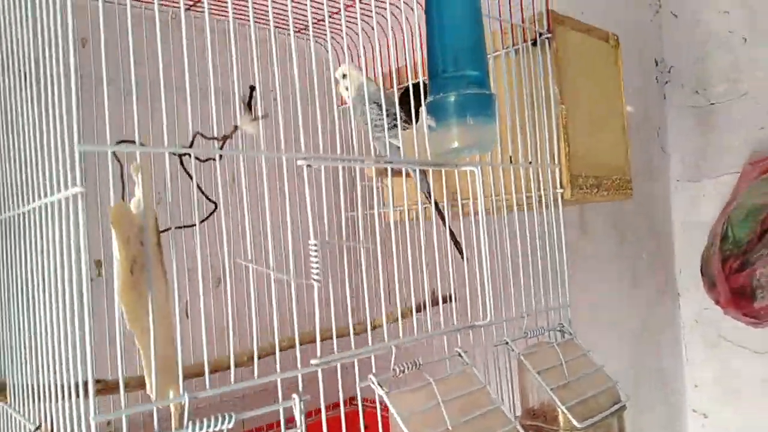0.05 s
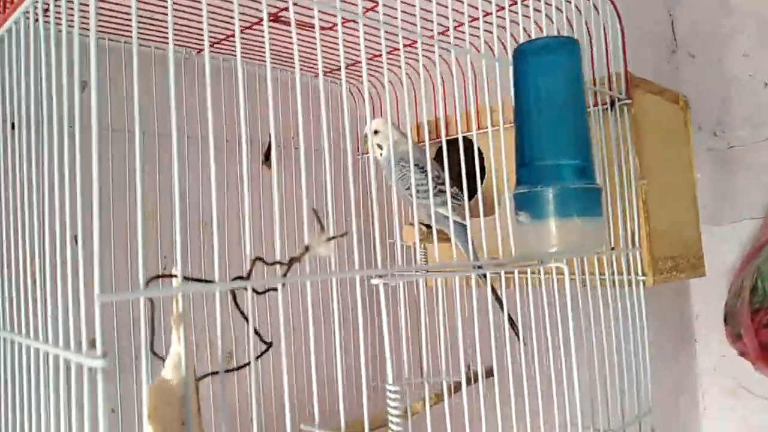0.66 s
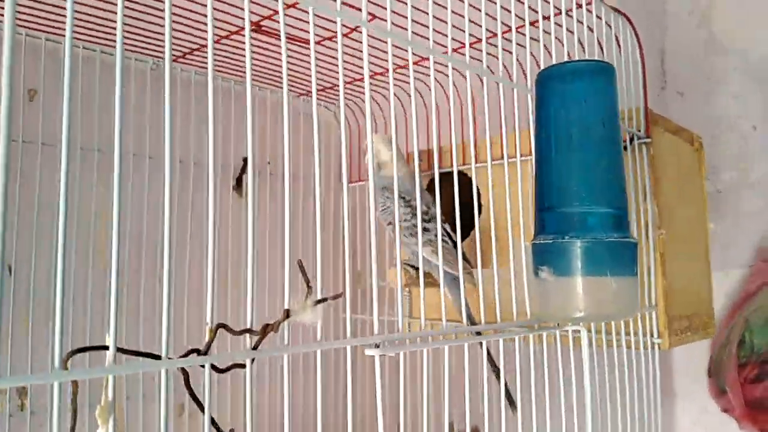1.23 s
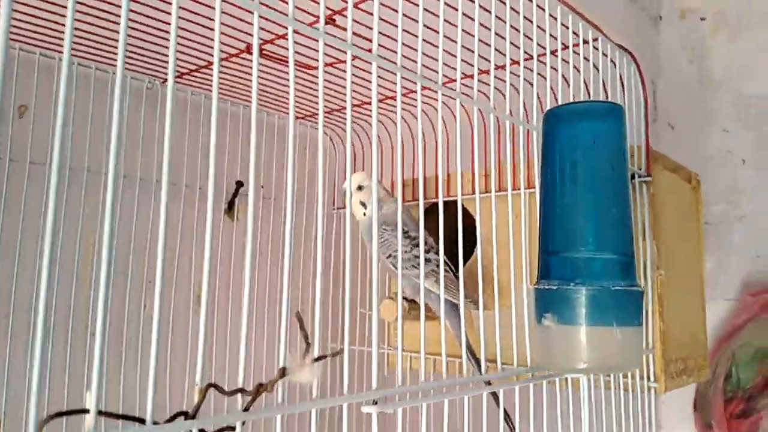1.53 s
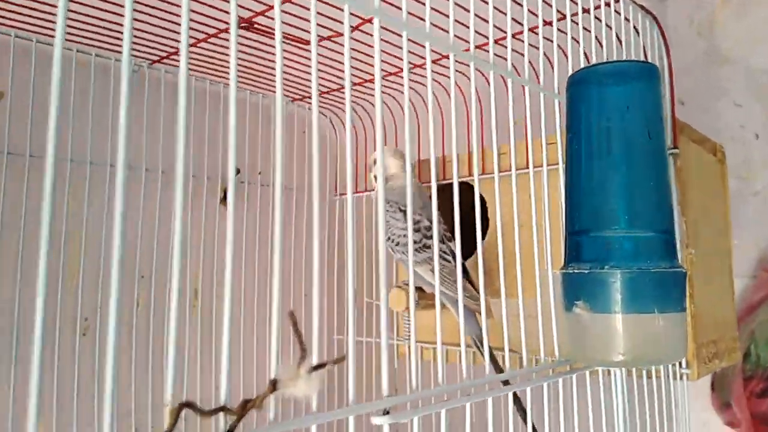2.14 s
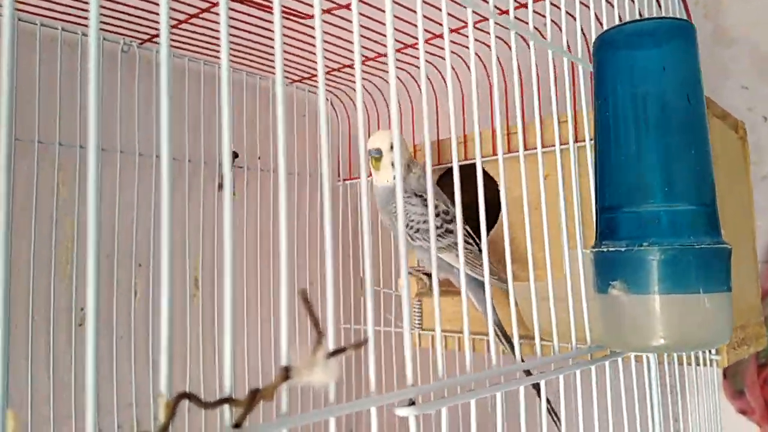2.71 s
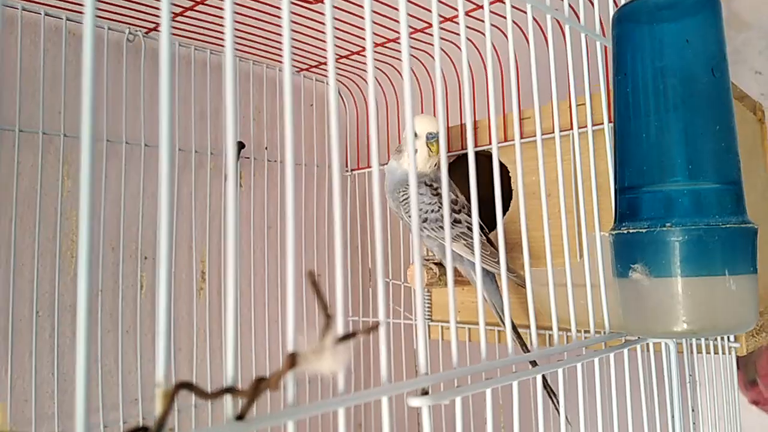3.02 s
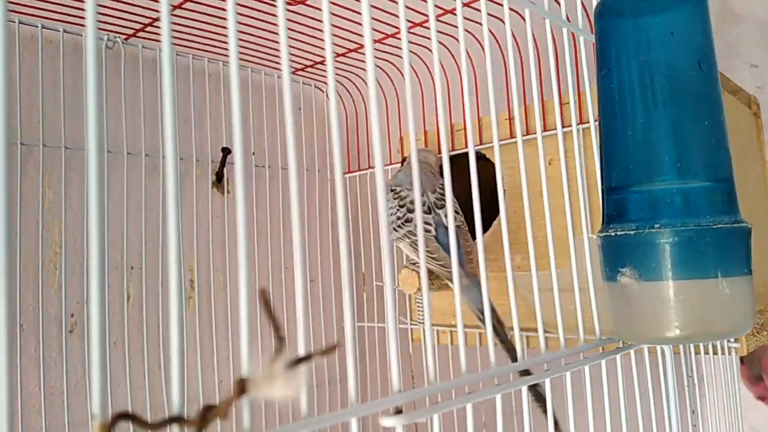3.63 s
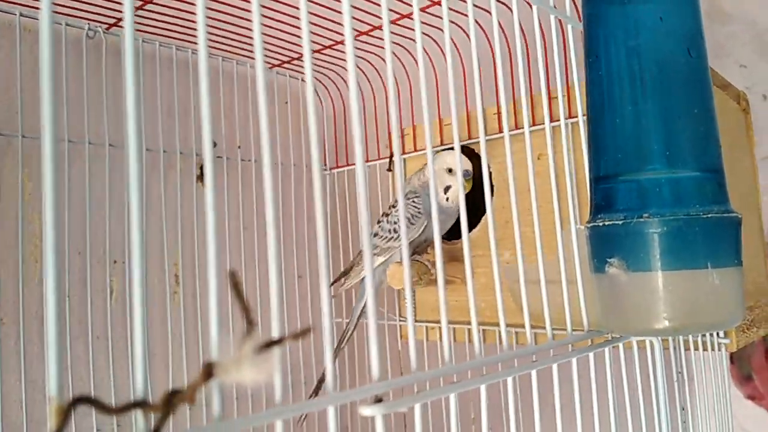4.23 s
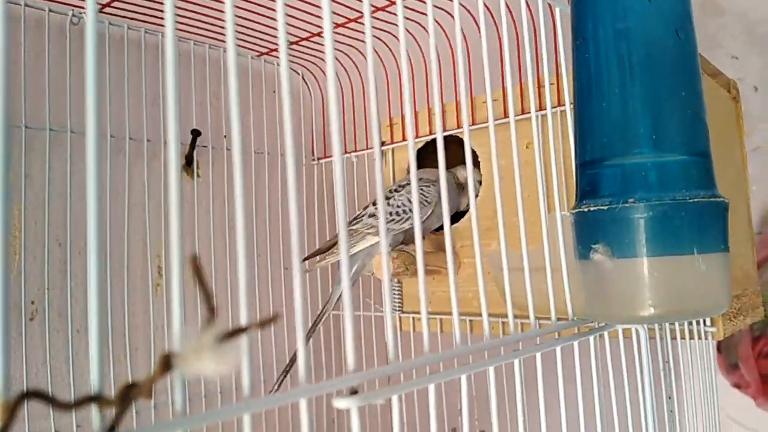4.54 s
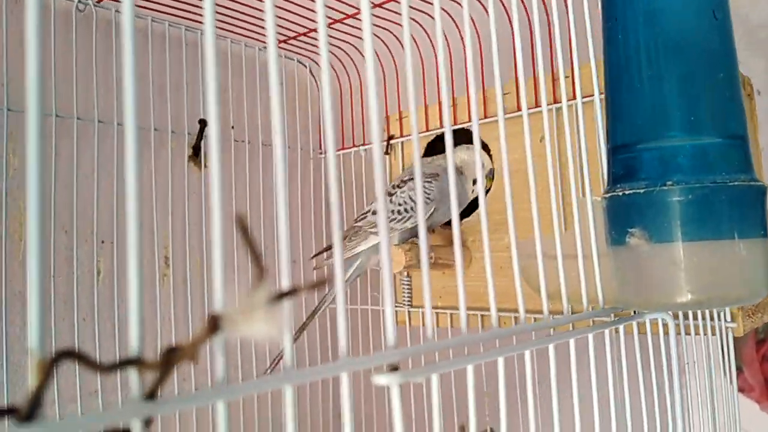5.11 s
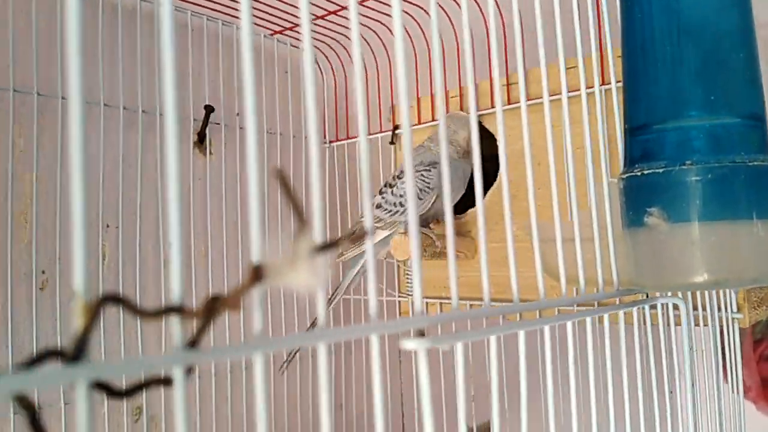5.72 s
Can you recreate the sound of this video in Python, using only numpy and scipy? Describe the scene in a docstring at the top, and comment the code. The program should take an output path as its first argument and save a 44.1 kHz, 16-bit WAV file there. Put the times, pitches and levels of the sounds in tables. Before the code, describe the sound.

Several budgies chatter in short bursts in a bare room, one shrieking loudly, while feathers rustle and a hollow nest box is bumped.

```python
"""Budgerigars chatter in a wire cage in a bare room, one near on the left, others further off.
They open with dry rasps, squeaks and whistles that fall and break up, each a buzz of the syrinx shaped
by windpipe and beak, while feathers rustle, wires tick and the hollow nest box takes a double bump.
After a lull and a distant mutter, more bumps and scuffs set the box ringing. Near five seconds one
shriek overloads the microphone; a warble and a last chirp follow. The room rumbles low throughout."""
import sys
import numpy as np
from scipy import signal
from scipy.fft import rfft, irfft
from scipy.io import wavfile

SR = 44100
rng = np.random.default_rng(int(sys.argv[2]) if len(sys.argv) > 2 else 0)


def store_wav(level_fs):
    """Save 16-bit WAV to argv[1]."""
    pcm = np.round(np.clip(np.atleast_2d(level_fs), -1, 1) * 32767)
    wavfile.write(sys.argv[1], SR, pcm.T.astype(np.int16))


N = 258426
TIME = np.arange(N) / SR
CUTOFF_HZ = 14900


def syllable(contour, breath_db, air_db, attack_s=0.0012, release_s=0.0035, harmonics=14):
    """The syrinx buzzes at one pitch; as it turns rough, its cycles scatter in length and strength."""
    # The two pass bands of windpipe and beak. Each row: frequency in Hz, gain in dB.
    lower_band = [(500, -30.5), (900, -16), (1400, -17), (2200, 3.5), (3000, 1), (4200, -3.5), (5000, -4),
                  (6200, -65)]
    upper_band = [(4200, -31), (5200, -13), (7000, 8.5), (8300, -12), (9200, -14), (10000, -56.5),
                  (15000, -55.5)]
    # Thin air noise from the beak of a rough voice. Each row: frequency in Hz, noise density in dB.
    beak_air = [(7000, -21.5), (9000, -0.5), (10300, -9), (12000, -8), (14500, -15)]
    jitter, waver, shimmer, doubling, tilt = 0.19, 0.13, 0.75, 0.6, 0.49
    start, end = max(contour[0][0], 0), contour[-1][0]
    span = np.arange(int(start * SR), min(int((end + 5 * release_s) * SR), N))
    t = span / SR
    pitch, level_db, upper_db, rough = in_time(contour, t)
    rough = np.clip(rough, 0, 1) + 0.0037
    scatter = rough * (jitter * wobble(len(t), 425) + waver * wobble(len(t), 130))
    phase = 2 * np.pi * np.cumsum(pitch * (1 + scatter)) / SR
    orders = np.arange(1, 2 * harmonics + 1)[:, None] / 2
    partial_hz = orders * pitch
    partials = np.cos(orders * phase) * (partial_hz < CUTOFF_HZ)
    # Strong and weak cycles alternate in a rough voice, adding partials between the harmonics.
    source = np.where(orders % 1 > 0, doubling * rough, 1) / np.sqrt(np.maximum(orders, 1))
    # The wider the beak opens, the stronger the upper band and the brighter the lower one.
    opening_db = tilt * upper_db * np.log2(partial_hz / pitch)
    air = rng.standard_normal(len(t)) * (1 + np.cos(phase))   # one puff a cycle
    voice = from_db(air_db) * rough * coloured(air, beak_air)
    beak_top = signal.butter(7, 8800, fs=SR, output="sos")   # little gets past the top resonance
    for band, band_db, slope_db in ((lower_band, 0, opening_db), (upper_band, upper_db, 0)):
        weights = source * from_db(at_hz(band, partial_hz) + slope_db)
        tone = (weights * partials).sum(0) / np.sqrt((weights ** 2).sum(0) / 2)
        breath = from_db(breath_db) * rough * coloured(air, band)
        voice += from_db(band_db) * signal.sosfilt(beak_top, tone + breath)
    flutter = rms_one(np.exp(shimmer * np.sqrt(rough) * np.tanh(wobble(len(t), 400))))
    return span, voice * flutter * gate(t, start, end, attack_s, release_s) * from_db(level_db)


def bird(contours, breath_db, air_db, low_cut_hz):
    """Syllables in a row; so small a beak radiates no bass."""
    voice = np.zeros(N)
    for contour in contours:
        span, sound = syllable(contour, breath_db, air_db)
        voice[span] += sound
    return signal.sosfilt(signal.butter(4, low_cut_hz, "high", fs=SR, output="sos"), voice)


def long_calls():
    """The near bird's piercing shriek and its softer, tumbling warble."""
    # Voice contours. Each row: time in seconds, pitch in Hz, relative level in dB,
    # upper band against lower in dB, roughness from 0 to 1.
    shriek = [(4.872, 4953, -21, 2, 0.31), (4.881, 3615, -18, -3.5, 0.31), (4.886, 4480, -16, -6.5, 0.15),
              (4.897, 4390, -11.5, 0, 0.22), (4.902, 4162, -3.5, -10.5, 0), (4.929, 4067, -4.5, -6, 0.05),
              (4.939, 2764, -18, 3, 0.32), (4.954, 2843, -8.5, -13.5, 0.01), (4.973, 2670, -21, 1, 0.6),
              (4.984, 3000, -7, -22, 0), (4.996, 3865, -7.5, -3, 0.08), (5.008, 3800, -40, -31, 0.42)]
    warble = [(5.603, 4510, -24, -24, 0.033), (5.613, 4016, -19.5, -13, 0.05),
              (5.625, 2316, -17.5, 1.5, 0.33), (5.647, 2605, -26.5, -11.5, 0.34),
              (5.678, 3594, -19, -6, 0.23), (5.7, 2822, -18.5, -18.5, 0.18),
              (5.724, 2110, -24.5, -4.5, 0.38), (5.748, 1627, -34.5, -22, 0.22)]
    return [shriek, warble]


def chatter(who):
    """Voice contours for the short calls from "near" or "far"."""
    # Breaking whistles. Each row: start and whistle length in seconds, start and held pitch in Hz,
    # first and last whistle level in dB, upper band against lower in dB, break length in seconds,
    # break level in dB, end pitch in Hz, end level in dB, bird. All levels are relative.
    chirps = [(0.132, 0.038, 4230, 3536, -25.5, -33.5, -6, 0.04, -33, 1450, -30.5, "far"),
              (0.31, 0.032, 3870, 3500, -36, -38, -15, 0.053, -24, 1895, -30.5, "near"),
              (0.858, 0.026, 3547, 3135, -34, -20.5, 3, 0.043, -30.5, 1672, -31.5, "near"),
              (1.25, 0.007, 3114, 3070, -14.5, -9, -22, 0.052, -35.5, 1525, -26.5, "near"),
              (2.005, 0.036, 4330, 3680, -44.5, -31.5, 7.5, 0.033, -31.5, 1710, -28, "far"),
              (2.126, 0.024, 3930, 3426, -37, -32, 9.5, 0.02, -27.5, 1670, -33.5, "far"),
              (4.02, 0.039, 4410, 3760, -27, -42, -4.5, 0.032, -42.5, 1451, -32.5, "far"),
              (4.688, 0.026, 3388, 3554, -16.5, -23.5, -1.5, 0.047, -16.5, 2112, -30, "near"),
              (5.127, 0.02, 3710, 3480, -19.5, -35, 4, 0.02, -40, 1538, -32, "far"),
              (5.232, 0.024, 3870, 3576, -24.5, -26, -0.5, 0.037, -36.5, 1648, -32.5, "far"),
              (5.36, 0.011, 4663, 3165, -26.5, -22.5, -8.5, 0.05, -30, 1608, -26.5, "near"),
              (5.808, 0.029, 3450, 2505, -25, -24.5, -15.5, 0.01, -26, 1670, -26.5, "near")]
    # Dry, low buzzes. Each row: start and length in seconds, pitch in Hz, level in dB,
    # upper band against lower in dB, roughness from 0 to 1, bird.
    rasps = [(0, 0.035, 1963, -24.5, -10.5, 0.52, "near"), (0.063, 0.0323, 1141, -29.5, -10, 0.79, "far"),
             (0.244, 0.046, 867, -28, -9, 0.22, "near"), (0.788, 0.031, 847, -27.5, -3, 0.33, "near"),
             (1.118, 0.016, 946, -21, 5, 0.49, "near"), (1.146, 0.048, 991, -21, 5, 0.55, "near"),
             (1.946, 0.057, 966, -31, -5, 0.31, "far"), (3.959, 0.04, 1090, -42.5, 4, 0.42, "far"),
             (4.619, 0.055, 884, -28, 4.5, 0.6, "near"), (5.496, 0.051, 927, -31, -9.5, 0.71, "near")]
    # Quick glides. Each row: start and length in seconds, first and last pitch in Hz, peak level in dB,
    # upper band against lower in dB, roughness from 0 to 1, bird.
    squeaks = [(0.279, 0.011, 5200, 5080, -35, -37, 0.1, "far"),
               (1.187, 0.0093, 3800, 4375, -23.5, -38, 0, "near"),
               (1.227, 0.011, 3610, 3196, -19, 2, 0.04, "near"),
               (2.189, 0.027, 1484, 2860, -29, -16.5, 0.08, "far"),
               (2.219, 0.01, 3036, 2990, -25.5, -6, 0.07, "far"),
               (2.233, 0.016, 1658, 1490, -33.5, -29, 0, "far"),
               (2.29, 0.054, 2498, 2975, -29, -13.5, 0.12, "far"),
               (2.358, 0.012, 3944, 4030, -27.5, -3.5, 0.41, "far"),
               (5.06, 0.014, 3770, 1850, -30.5, -26, 0.33, "far"),
               (5.083, 0.0056, 4770, 4200, -24, -11, 0.04, "far"),
               (5.096, 0.0305, 2773, 3010, -31.5, -5, 0.29, "far"),
               (5.207, 0.025, 3390, 2470, -42, 7, 0.22, "far"),
               (5.342, 0.017, 1303, 1395, -39.5, -3, 0.2, "near")]
    kinds = ((chirp, chirps), (rasp, rasps), (squeak, squeaks))
    return [shape(*row[:-1]) for shape, table in kinds for row in table if row[-1] == who]


def chirp(start, whistle_s, start_hz, held_hz, first_db, last_db, upper_db,
          break_s, break_db, end_hz, end_db):
    """A clean whistle scoops onto its pitch and sags, then drops by about an octave and turns rough."""
    scoop_s, sag_per_s, fall_s, roughen_s = 0.006, 0.3, 0.013, 0.03
    t = np.linspace(0, whistle_s + break_s, 60)
    since_break = np.maximum(t - whistle_s, 0)
    whistle_hz = (held_hz + (start_hz - held_hz) * np.exp(-t / scoop_s)) * (1 - sag_per_s * t)
    pitch = end_hz + (whistle_hz - end_hz) * np.exp(-since_break / fall_s)
    settled = whistle_s + 0.13 * break_s
    level = np.interp(t, [0, whistle_s, settled, t[-1]], [first_db, last_db, break_db, end_db])
    # The beak is narrow at the break, then opens a little.
    upper = np.interp(t, [whistle_s / 2, settled, t[-1]], [upper_db, -16.5, -12.5])
    rough = 0.05 + 0.81 * (1 - np.exp(-since_break / roughen_s))
    return np.column_stack([start + t, pitch, level, upper, rough])


def rasp(start, length, hz, db, upper_db, rough):
    """A low buzz starts hard, then rises in pitch as it fades and the beak closes."""
    rise, fade_db, close_db = 0.29, 9.5, 18
    return [(start, hz, db, upper_db, rough),
            (start + length, hz * (1 + rise), db - fade_db, upper_db - close_db, rough)]


def squeak(start, length, from_hz, to_hz, db, upper_db, rough):
    """One straight glide that swells quickly, then only a little more."""
    return [(start + share * length, from_hz + share * (to_hz - from_hz), db + swell_db, upper_db, rough)
            for share, swell_db in ((0, -5), (0.47, 0), (1, 1.5))]


def muttering(upper_db, rough, count=10):
    """A distant bird's faint falling rasps, uneven in timing, pitch and strength."""
    start_s, gap_s, length_s, hz, fall, level_db = 3.3, 0.025, 0.026, 2040, 0.2, -72.5
    chance = rng.standard_normal((count, 3)) * [0.2, 0.08, 2]
    return [squeak(start_s + (k + late) * gap_s, length_s, hz * (1 + sharp), hz * (1 + sharp - fall),
                   level_db + louder_db, upper_db, rough)
            for k, (late, sharp, louder_db) in enumerate(chance)]


def nest_box(swell_t60=0.043):
    """Soft bumps and spells of scuffing set the hollow wooden box ringing."""
    # The box's resonances. Each row: frequency in Hz, gain in dB, 60 dB decay time in seconds.
    modes = [(335, 2, 0.088), (358, 0, 0.085), (522, -10, 0.07), (593, -15.5, 0.026), (682, -7.5, 0.075),
             (1190, -25, 0.045), (1390, -29, 0.043)]
    # Knocks on the wood. Each row: time in seconds, relative level in dB, upper-mode boost in dB.
    bumps = [(0.075, -24.5, 9.5), (0.087, -24.5, -6), (3.535, -31.5, -3), (3.809, -34.5, -12),
             (3.895, -31.5, 1), (3.944, -42.5, 18.5), (3.97, -33, -11), (4.052, -32.5, 11),
             (4.096, -18.5, -8), (4.126, -27.5, -24), (5.126, -36, 13.5)]
    # Rubbing on the wood. Each row: start and length in seconds, relative level in dB.
    scuffs = [(0.2, 0.26, -52), (0.48, 0.32, -59), (1.3, 0.16, -60.5), (1.8, 0.22, -65.5),
              (3.55, 0.073, -43), (3.72, 0.4, -44.5), (4.2, 0.34, -57), (5.0, 0.25, -54)]
    times, bump_db, upper_db = np.transpose(bumps)
    friction = rng.standard_normal(N) * from_db(3.5 * wobble(N, 30))
    knocks, rubbed = 0, 0
    for hz, mode_db, t60 in modes:
        blow_db = bump_db + mode_db + upper_db * (hz > 450) + rng.normal(0, 1, len(times))
        blows = np.zeros(N)
        blows[(times * SR).astype(int)] = from_db(blow_db)
        # The air in the box takes a few cycles to swell: subtracting a second ring softens the onset.
        knocks += ring(blows, hz, t60) - ring(blows, hz, swell_t60)
        rubbed += from_db(mode_db) * (ring(friction, hz, t60) - ring(friction, hz, swell_t60))
    return from_db(2.5) * knocks + from_db(-4) * spells(scuffs) * rms_one(rubbed)


def wire_ticks(decay_s):
    """Claws and wires meet in hard little contacts, each a very short crack."""
    # The contacts. Each row: time in seconds, relative level in dB.
    ticks = [(0.487, -47), (0.499, -36.5), (0.508, -46), (0.68, -44.5), (3.416, -43), (3.422, -49.5),
             (3.924, -39)]
    # Their bright colour. Each row: frequency in Hz, noise density in dB.
    tick_colour = [(150, -36), (500, 2), (1200, -7), (2000, 6), (4000, -11), (7500, 4), (10000, -6.5),
                   (13000, -10), (15000, -30)]
    clicks = np.zeros(N)
    for start, db in ticks:
        clicks[int(start * SR)] = from_db(db)
    envelope = signal.lfilter([1], [1, -np.exp(-1 / (decay_s * SR))], clicks + 1e-18)
    return 1.9 * envelope * coloured(rng.standard_normal(N), tick_colour)


def feathers(hiss_db):
    """Feathers rustle in flickering spells over a faint hiss of the same colour."""
    # The papery colour of feathers. Each row: frequency in Hz, noise density in dB.
    feather_colour = [(590, -36.5), (1000, -12.5), (1110, -15.5), (1320, -2.5), (1800, -5.5), (2570, -1),
                      (3900, -11), (4610, -5), (5130, -8.5), (7330, 0), (8370, -12), (10900, -17),
                      (18400, -120)]
    # Spells of rustling. Each row: start and length in seconds, relative level in dB.
    rustles = [(0, 0.53, -53), (0.608, 0.033, -52.5), (0.75, 0.74, -63), (1.6, 0.9, -70),
               (2.78, 0.35, -72.5), (3.5, 1.157, -62.5), (3.95, 0.13, -44), (5.03, 0.33, -42)]
    noise = panned(stereo_noise(feather_colour, side_db=0.5), left_db=1.6)
    flicker = from_db(-0.5 + 1.7 * wobble(N, 50))
    return noise * (spells(rustles) + from_db(hiss_db)) * flicker


def hollow_hum(hz):
    """A faint hollow hum comes and goes: noise through one narrow resonance."""
    # Spells of hum. Each row: start and length in seconds, relative level in dB.
    hums = [(1.02, 0.16, -67), (1.13, 0.093, -59.5), (1.79, 0.29, -65)]
    return from_db(1) * spells(hums) * rms_one(ring(rng.standard_normal(N), hz, t60=0.067))


def room_rumble(gain_db):
    """The room's low rumble, slowly rising and sinking."""
    # Its dark colour. Each row: frequency in Hz, noise density in dB.
    rumble_colour = [(25, -30), (52, -25.5), (78, 3), (120, -4.5), (160, 0), (220, -9.5), (300, -9.5),
                     (420, -30), (600, -29.5), (900, -51.5), (2000, -73)]
    # Its slow drift. Each row: time in seconds, relative level in dB.
    drift = [(0.0, -57.5), (0.28, -55), (0.45, -52.5), (1.8, -63), (2.14, -57.5), (3.13, -65), (4.34, -55),
             (5.86, -57)]
    noise = panned(stereo_noise(rumble_colour, side_db=-7), left_db=2)
    return noise * from_db(in_time(drift)[0] + gain_db)


def room_tail(build_s):
    """Diffuse echoes build up, then die away band by band."""
    # The bare room's decay. Each row: frequency in Hz, 60 dB decay time in seconds.
    room_t60 = [(300, 0.31), (1000, 0.4), (2600, 0.29), (7000, 0.24), (14000, 0.27)]
    t, tail = TIME[:SR // 2], 0
    edges = np.geomspace(150, 16000, 8)
    for low, high in zip(edges, edges[1:]):
        band_pass = signal.butter(2, [low, high], "band", fs=SR, output="sos")
        band = signal.sosfilt(band_pass, rng.standard_normal((2, len(t))))
        tail += band * np.exp(-np.log(1000) * t / at_hz(room_t60, np.sqrt(low * high)))
    return rms_one(tail * (1 - np.exp(-t / build_s))) / np.sqrt(len(t))


def in_room(x, left_db, lag_s, early_db, tail_db, tail_left_db, echoes=10):
    """Direct sound, a few echoes from the corner behind the cage, and the room's tail."""
    tail = panned(room_tail(build_s=0.0061), tail_left_db) * from_db(tail_db)
    near_paths = np.zeros_like(tail)
    near_paths[0, int(lag_s * SR)] = near_paths[1, 0] = 1
    for side in near_paths:
        delays = (rng.uniform(0.0012, 0.016, echoes) * SR).astype(int)
        side[delays] += from_db(early_db) * rng.choice([-1, 1], echoes) / np.sqrt(echoes)
    return signal.fftconvolve(x[None], tail + panned(near_paths, left_db), axes=1)[:, :N]


def gate(t, start, end, attack_s, release_s):
    """An envelope that swells, holds and dies away."""
    attack = 1 - np.exp(-np.maximum(t - start, 0) / attack_s)
    return attack * np.exp(-np.maximum(t - end, 0) / release_s)


def spells(rows):
    """The summed gain of soft-edged spells of sound."""
    return sum(from_db(db) * gate(TIME, start, start + length, attack_s=0.0083, release_s=0.056)
               for start, length, db in rows)


def ring(x, hz, t60):
    """A resonance: a unit click sets a sine of height 1 ringing."""
    r, w = np.exp(-np.log(1000) / (t60 * SR)), 2 * np.pi * hz / SR
    return signal.lfilter([0, np.sin(w)], [1, -2 * r * np.cos(w), r * r], x + 1e-18)


def wobble(size, hz):
    """Random motion up to a given rate, at unit rms."""
    low_pass = signal.butter(2, hz, fs=SR, output="sos")
    return rms_one(signal.sosfilt(low_pass, rng.standard_normal(size + SR // 10))[-size:])


def stereo_noise(spectrum, side_db):
    """Coloured noise, partly alike in both channels."""
    mid, side = rng.standard_normal((2, N))
    return coloured(mid + from_db(side_db) * side * np.array([[1], [-1]]), spectrum)


def coloured(x, spectrum):
    """A signal shaped by a spectrum, at unit rms."""
    size = x.shape[-1]
    gains = from_db(at_hz(spectrum, np.fft.rfftfreq(size, 1 / SR)))
    return rms_one(irfft(rfft(x) * gains, size))


def panned(x, left_db):
    """Left over right by some dB at unchanged power."""
    return rms_one(from_db([[left_db / 2], [-left_db / 2]])) * x


def in_time(rows, t=TIME):
    """The columns of a contour, joined by straight lines."""
    times, *columns = np.transpose(rows)
    return [np.interp(t, np.sort(times), column) for column in columns]


def at_hz(points, hz):
    """A curve read on a log-frequency axis."""
    freqs, values = np.transpose(points)
    return np.interp(np.log(np.maximum(hz, 1)), np.log(freqs), values)


def from_db(db):
    return 10 ** (np.asarray(db) / 20)


def rms_one(x):
    return x / np.sqrt(np.mean(x ** 2) + 1e-20)


def scene():
    """Birds, box and wires echo in the room, over feather rustle and a low rumble."""
    near_calls = chatter("near") + long_calls()
    near = from_db(-3.5) * bird(near_calls, breath_db=-11.5, air_db=-23, low_cut_hz=913)
    far_calls = chatter("far") + muttering(upper_db=-23, rough=0.44)
    far = from_db(-6.5) * bird(far_calls, breath_db=-16, air_db=-20, low_cut_hz=1120)
    birds = in_room(near, left_db=8.5, lag_s=0.0004, early_db=-1.5, tail_db=-5.5, tail_left_db=8)
    birds += in_room(far, left_db=6.5, lag_s=0.0001, early_db=-1.5, tail_db=-2.5, tail_left_db=3.5)
    hollow = hollow_hum(hz=533) + nest_box()
    box = in_room(hollow, left_db=-0.5, lag_s=0.00007, early_db=-22, tail_db=-9.5, tail_left_db=2)
    ticks = wire_ticks(decay_s=0.002)
    wires = in_room(ticks, left_db=12.5, lag_s=0.0002, early_db=-9.5, tail_db=-5.5, tail_left_db=17)
    return birds + box + wires + feathers(hiss_db=-78.5) + room_rumble(gain_db=2)


def record(dry):
    """The microphone overloads: the loudest peaks flatten at full scale, and the top treble is cut."""
    clipped = dry / (1 + dry ** 8) ** (1 / 8)
    return signal.sosfilt(signal.ellip(10, 0.1, 80, CUTOFF_HZ, fs=SR, output="sos"), clipped)


dry = scene()
out = record(dry)
store_wav(out)
```